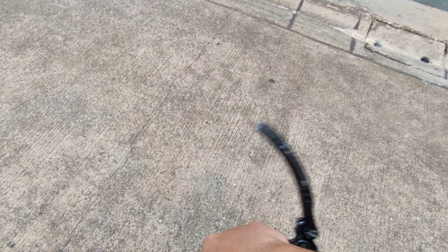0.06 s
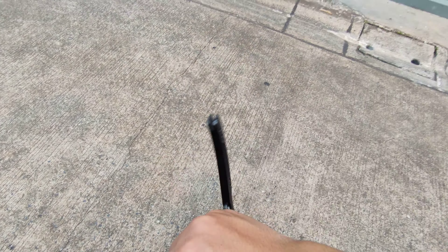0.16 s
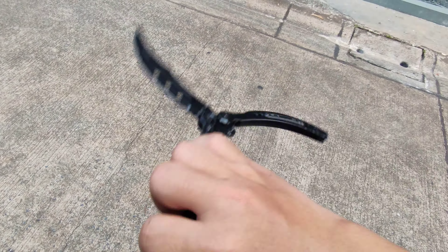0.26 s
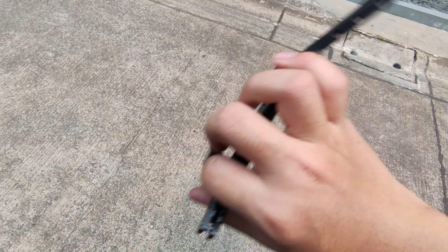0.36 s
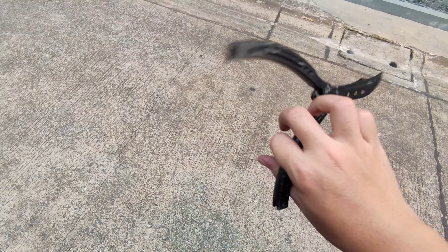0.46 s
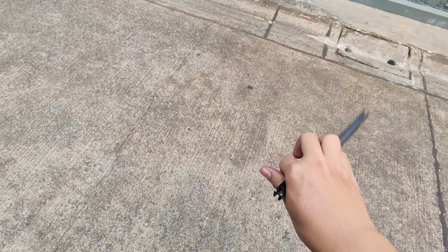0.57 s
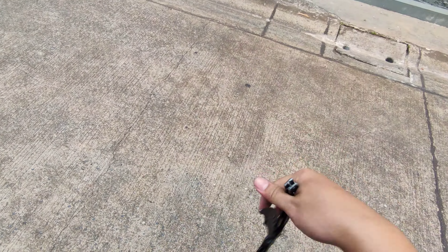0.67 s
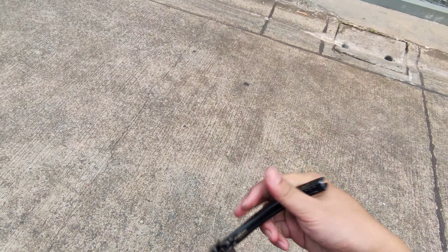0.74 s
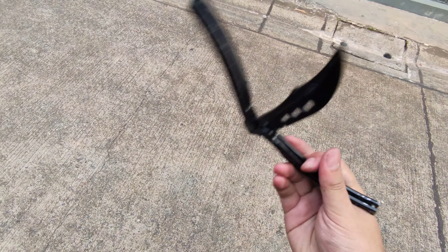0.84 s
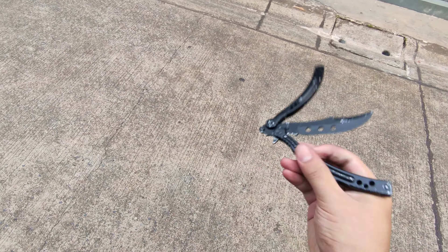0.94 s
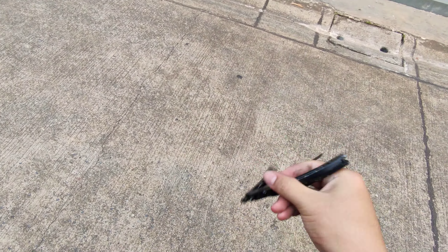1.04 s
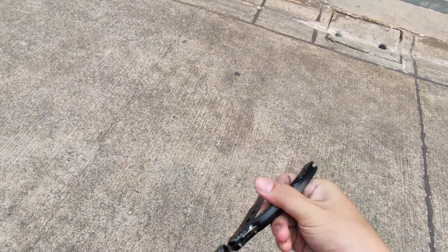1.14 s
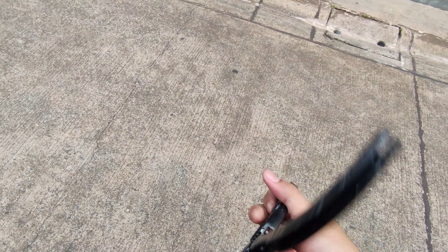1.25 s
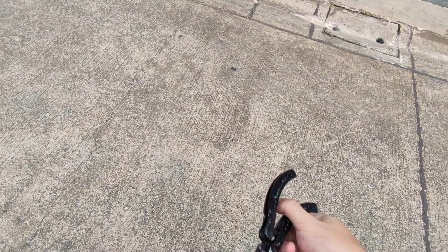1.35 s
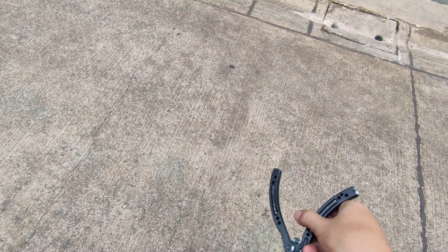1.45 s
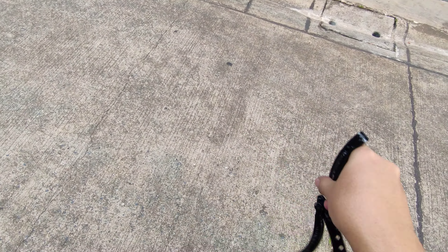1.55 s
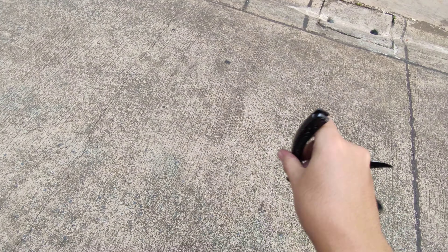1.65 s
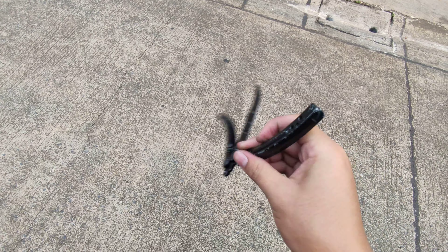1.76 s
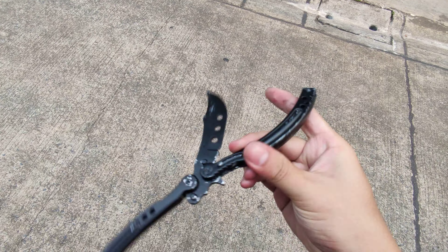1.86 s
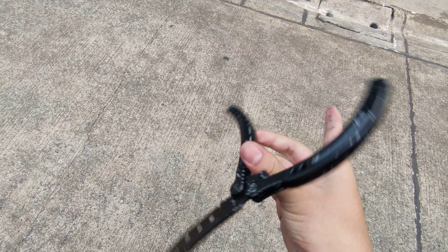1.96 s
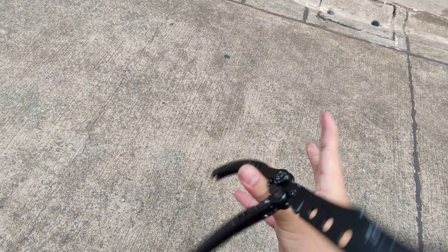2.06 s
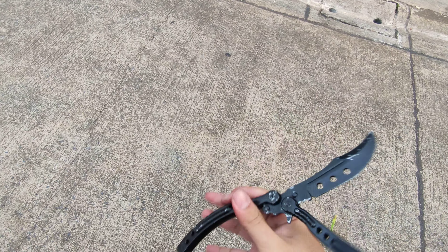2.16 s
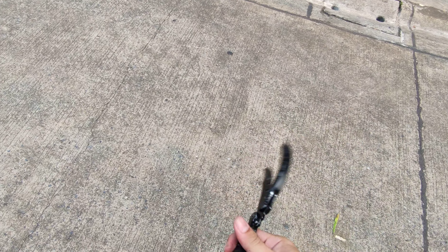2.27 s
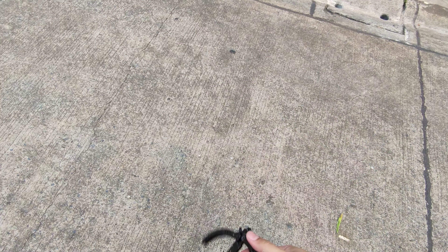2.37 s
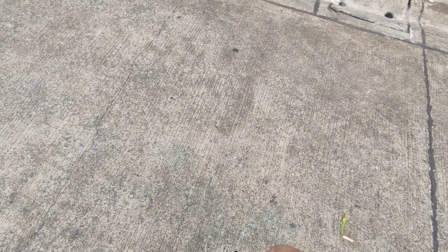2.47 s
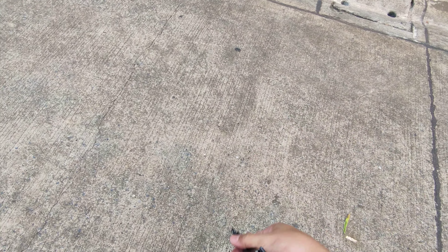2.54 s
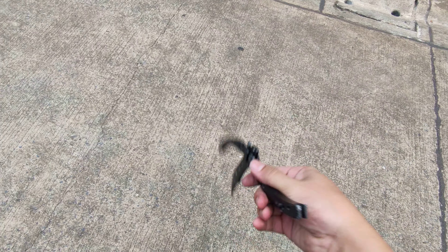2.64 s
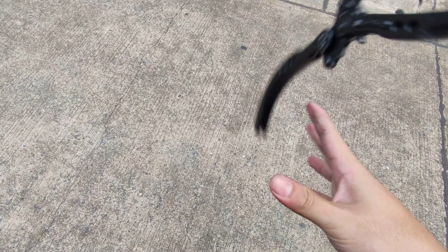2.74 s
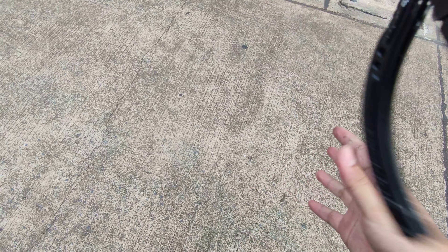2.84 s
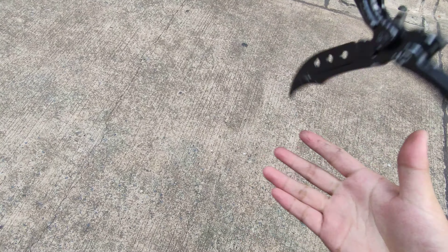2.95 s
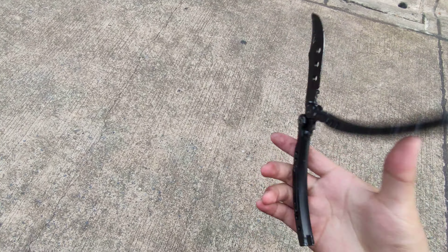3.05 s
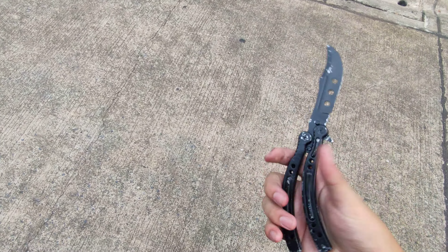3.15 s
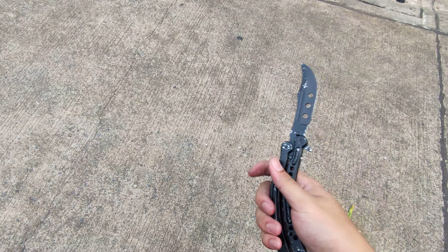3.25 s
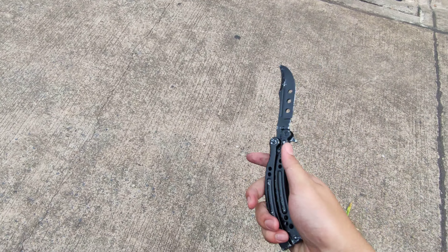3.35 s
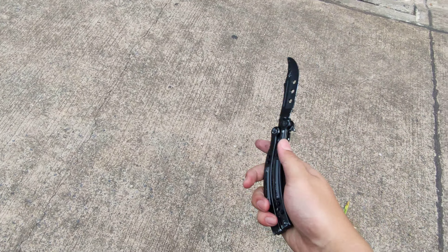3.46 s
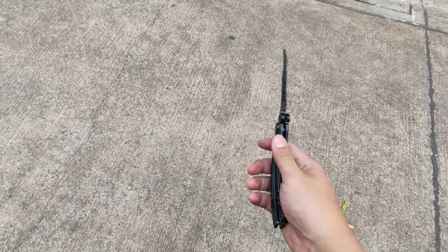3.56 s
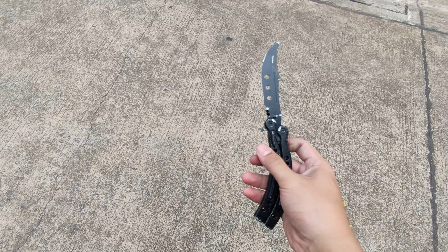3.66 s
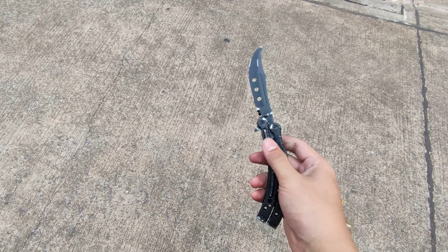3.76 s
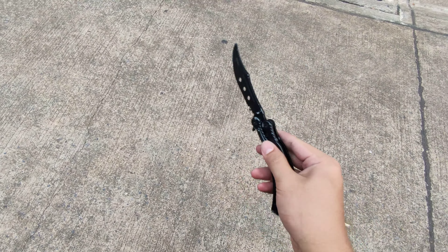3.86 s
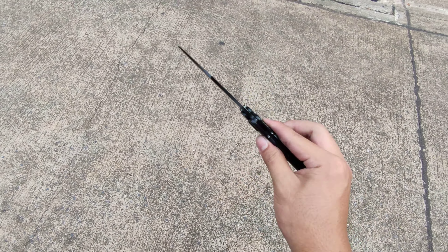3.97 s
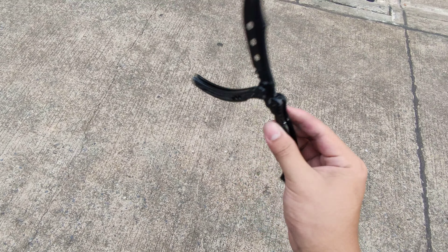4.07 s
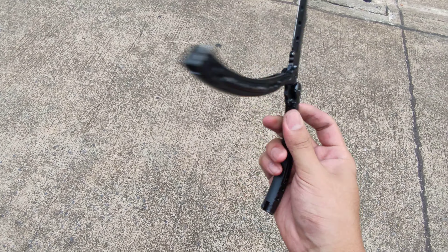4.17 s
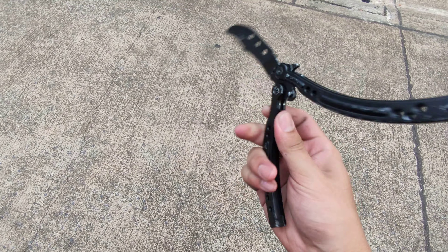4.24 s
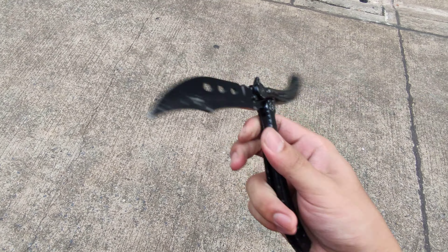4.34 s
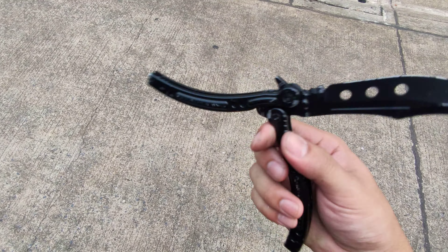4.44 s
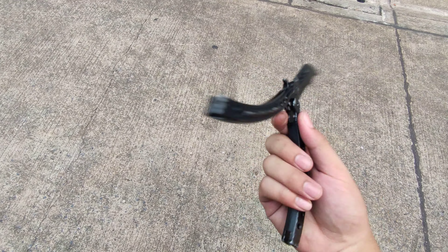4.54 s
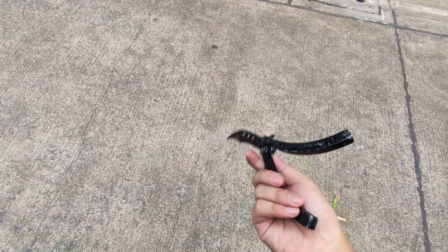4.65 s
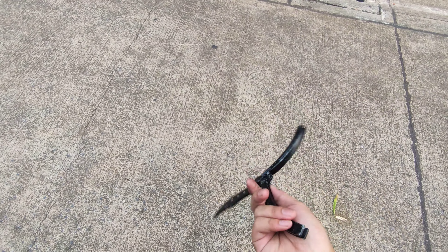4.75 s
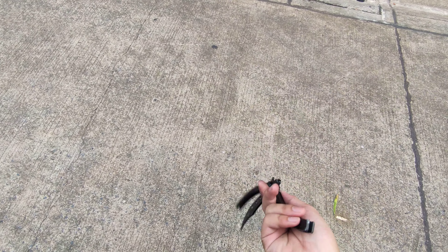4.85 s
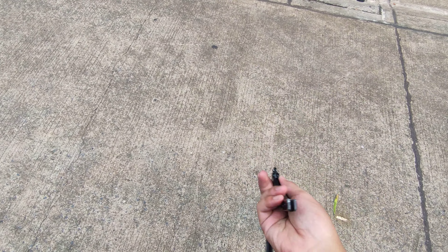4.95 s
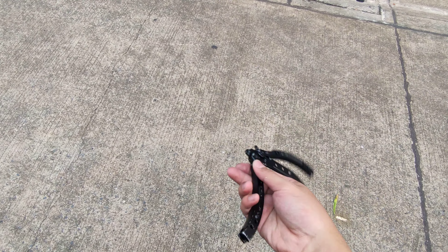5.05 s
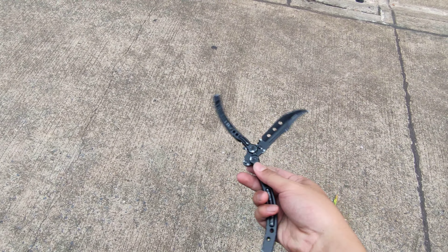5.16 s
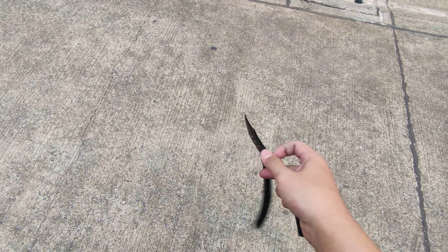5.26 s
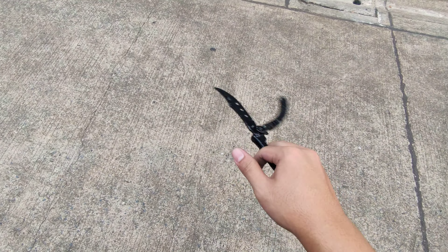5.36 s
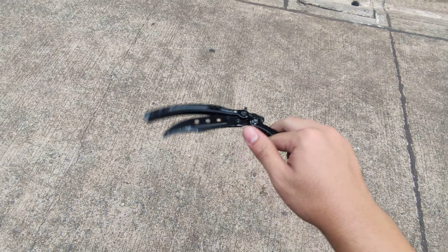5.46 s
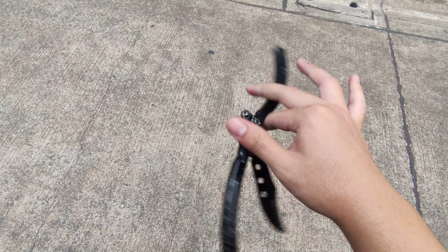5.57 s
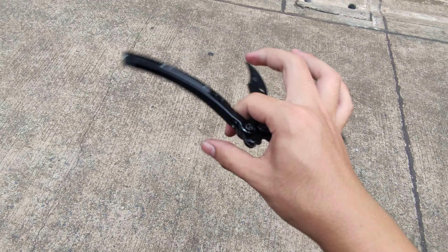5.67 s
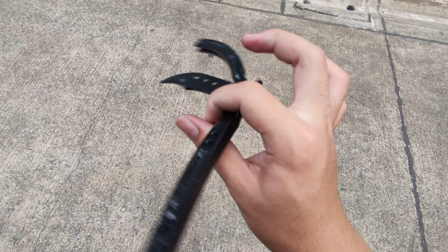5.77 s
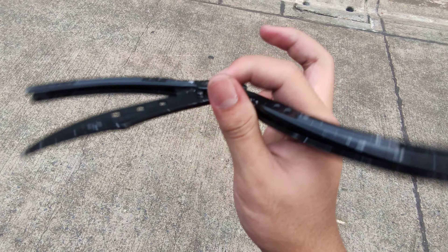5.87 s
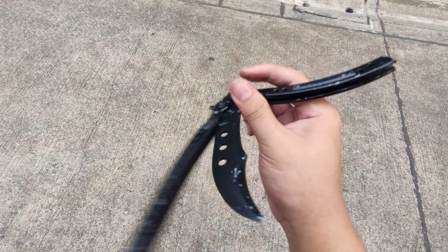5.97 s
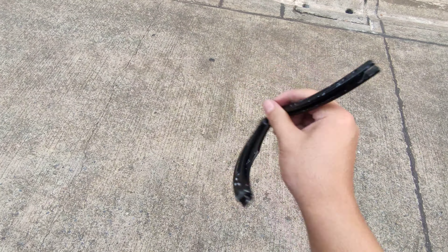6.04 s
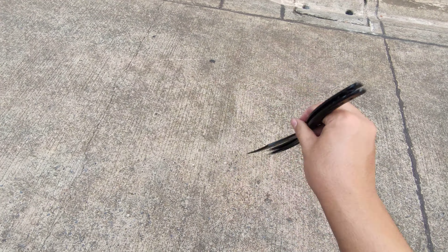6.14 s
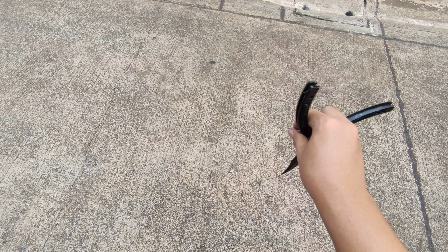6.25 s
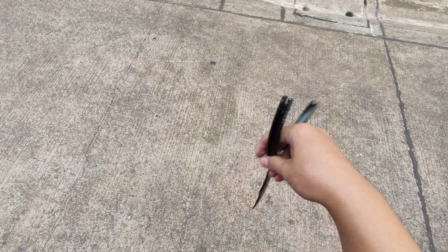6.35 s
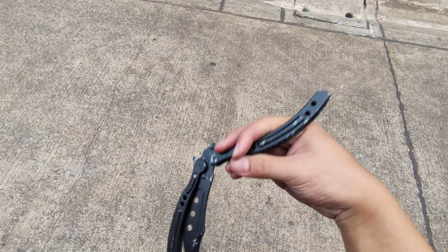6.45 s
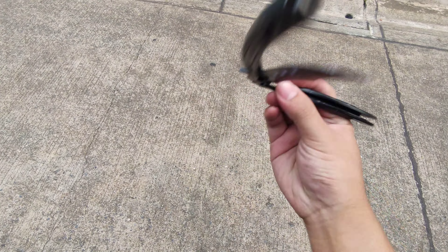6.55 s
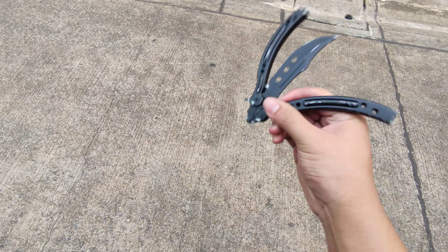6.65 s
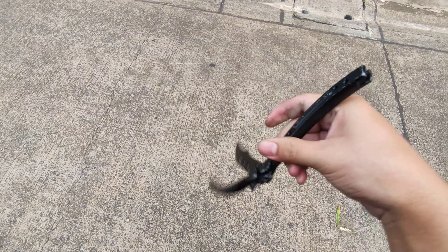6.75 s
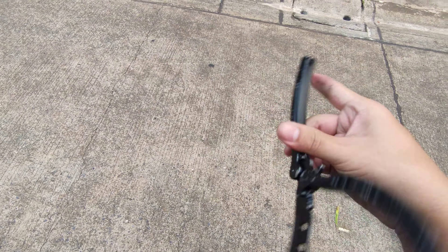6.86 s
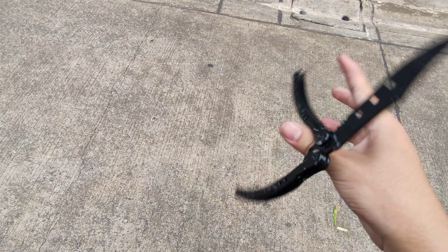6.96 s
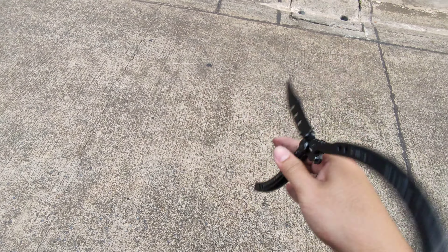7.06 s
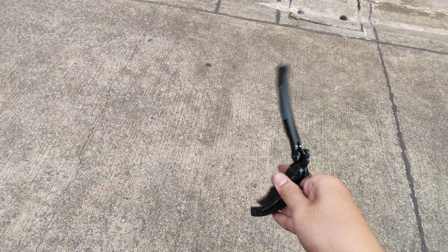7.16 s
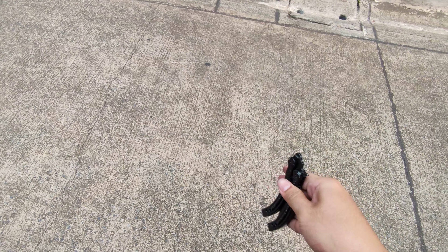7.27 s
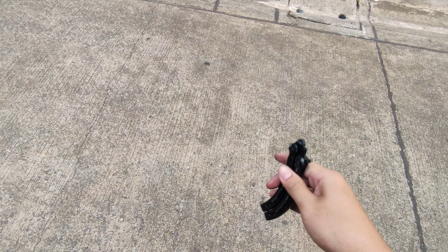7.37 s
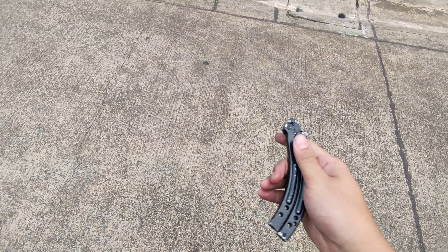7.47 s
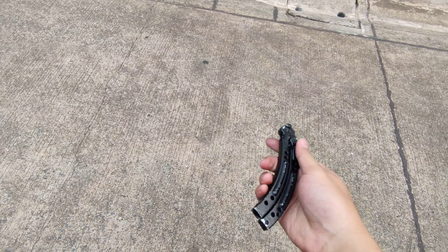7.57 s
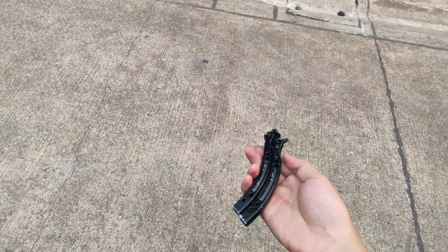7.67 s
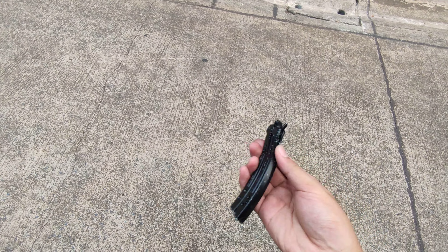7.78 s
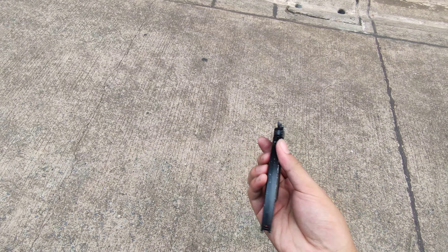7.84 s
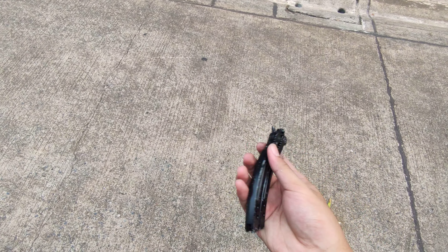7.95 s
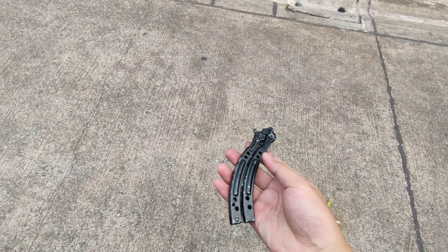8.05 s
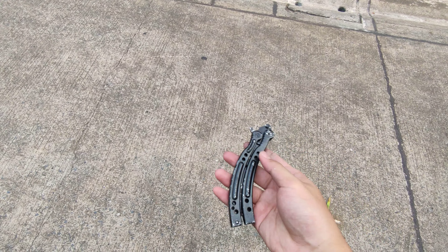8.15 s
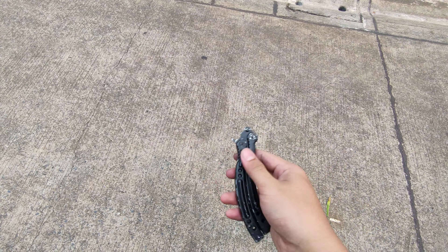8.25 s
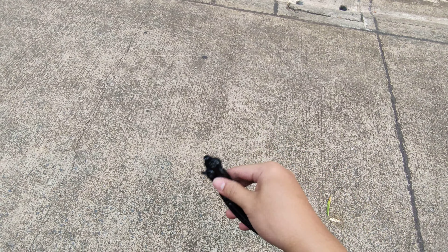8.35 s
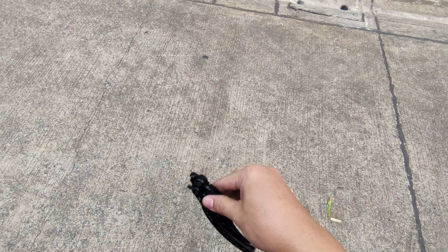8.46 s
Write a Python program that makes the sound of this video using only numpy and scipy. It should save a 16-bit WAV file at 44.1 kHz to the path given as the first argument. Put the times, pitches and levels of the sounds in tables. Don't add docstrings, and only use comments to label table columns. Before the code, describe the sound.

Outdoors near houses, birds whistle quickly while tiny pins and a latch tick. Metal handles then slap the palm and clatter in short dry bursts, separated by quieter ticking. A nasal bird squeal sounds midway, followed by another whistled song. Two loud snaps come late, then softer closing clacks. Low gusts buffet the close phone microphone above faint sleeve rustle and steady traffic; the treble is cut off.

```python
import sys
import numpy as np
from scipy import signal
from scipy.fft import rfft, irfft
from scipy.io import wavfile
from scipy.ndimage import uniform_filter1d, map_coordinates

SR = 44100
rng = np.random.default_rng(int(sys.argv[2]) if len(sys.argv) > 2 else 0)


def convert_level_to_amplitude(level_db):
    exponent = np.asarray(level_db, float) / 20
    return 10 ** exponent


def to_wav(s):
    ch = np.atleast_2d(s).T
    pcm = np.round(np.clip(ch, -1, 1) * 32767)
    wavfile.write(sys.argv[1], SR, pcm.astype(np.int16))


N = 375291
T = np.arange(N) / SR


def unit(x):
    return x / np.sqrt(np.mean(x ** 2))


def band(x, lo_hz, hi_hz, order=2):
    return signal.sosfilt(signal.butter(order, [lo_hz, hi_hz], "band", fs=SR, output="sos"), x)


def walk(rate):
    k = int(SR / rate)
    held = np.repeat(rng.standard_normal(N // k + 1), k)
    slewed = uniform_filter1d(uniform_filter1d(held, k), k)
    return unit(slewed[:N])


def coloured(table, lo_hz, hi_hz):
    hz = np.maximum(np.fft.rfftfreq(N, 1 / SR), 1)
    points = np.array(table)
    gain = convert_level_to_amplitude(np.interp(np.log(hz), np.log(points[:, 0]), points[:, 1]))
    gain = gain * (hz >= lo_hz) * (hz < hi_hz)
    return irfft(rfft(rng.standard_normal(N)) * gain, N)


def add(out, s, x):
    i = int(s * SR)
    out[i:i + len(x)] += x[:N - i]


def ring(modes, chance, detune=.018, scatter_db=2.5):
    t = T[:1024]
    out = np.zeros(len(t))
    for (hz, db, t60), (a, b) in zip(modes, chance):
        decay = np.exp(-np.log(1000) * t / t60)
        out += convert_level_to_amplitude(db + scatter_db * b) * np.sin(2 * np.pi * hz * (1 + detune * a) * t) * decay
    return out


def knife():
    # (time [s], peak [dB], handle ring re peak [dB], body clack re peak [dB])
    clacks = [
        (3.195, -15, -14.5, -17.5),
        (5.0869, -14, -10, -6),
        (5.3448, -12.5, -13, -7),
        (6.9905, -15.5, -25, -12.5),
        (7.3118, -25, -5, -6),
        (7.9922, -23, -7, -6.5),
        (8.061, -19.5, -10, -12),
    ]
    rebounds = [(0.383, -34.5, -21.5, 5.5), (0.495, -36, -19, -18), (0.5083, -18.5, -52, -45.5),
                (1.417, -30, -35, 0.5), (2.096, -28.5, -15, -15.5), (2.138, -27.5, -38, -9.5),
                (2.183, -27.5, -33, -16.5), (3.15, -30, -9.5, -7.5), (3.264, -25.5, -11, -13),
                (5.008, -24, -24, -2), (5.3593, -29.5, -11, -2.5), (5.397, -32, -21, -24.5),
                (6.0996, -19, -29, -23), (7.2757, -36.5, -17, -8.5), (7.711, -34, -7.5, 2),
                (7.748, -36.5, -6, 3.5), (7.923, -34, -8, -5.5), (8.001, -29, -7.5, -26),
                (8.075, -36.5, -17, 0), (8.307, -38, -5, -9)]
    snaps = [
        (7.2952, -18, -8.5, -13),
        (7.298, -4.5, -8.5, -11),
        (7.3036, -16, -11, -18),
        (7.317, -22, -8, -10.5),
        (7.3762, -2, -13.5, -6),
        (7.383, -16, -7.5, -16),
    ]
    blows = [(1.3962, -12.5, -24.5, -1), (1.3993, -20, -15.5, -3), (1.4032, -18, -12.5, 0),
             (1.4114, -28, -27, -13), (3.225, -11.5, -9.5, -16), (3.2275, -15.5, -10, -12),
             (3.2296, -6.5, -9.5, -10), (3.238, -10, -12.5, -13), (3.2372, -11.5, -17, -15.5),
             (3.2441, -11, -16.5, -12.5), (3.2462, -14.5, -22, -12), (3.2492, -16.5, -15, -8.5),
             (4.9899, -7, -18, -24), (4.9925, -8, -15, -14), (4.9944, -7, -12, -9), (4.997, -12, -16, -15),
             (5.0005, -18, -16, -14), (6.1143, -17, -8, -10), (6.1165, -19, -8, -14),
             (6.1195, -11, -8.5, -6), (6.122, -12, -7, -6), (6.1258, -16.5, -6.5, -13),
             (6.13, -15, -14, -16), (6.132, -17, -16.5, -20.5), (6.1348, -11.5, -10.5, -12),
             (6.137, -20, -18, -18), (6.5534, -37, -10.5, 0.5), (6.56, -31, -19, -7),
             (6.571, -28.5, -29, -12), (6.5745, -26, -33.5, -20.5), (6.58, -33, -24, -15),
             (7.3635, -30, -8, -6), (7.3695, -24, -14, -14), (7.372, -23, -12, -10),
             (7.3785, -12, -12, -5.5), (7.391, -21, -11, -7), (7.395, -22.5, -9, -4.5)]
    # (time [s], peak [dB], body clack re peak [dB])
    ticks = [(0.0136, -44.5, 9), (0.135, -42, 5.5), (0.182, -47, 4), (0.4614, -48.5, 5.5),
             (0.626, -42, -18), (0.657, -31, -22), (0.778, -34.5, -40), (5.871, -52.5, -5),
             (1.8, -34, -11.5), (2.1538, -36, -20), (2.178, -37, -25), (2.2887, -48.5, -7),
             (2.354, -34.5, -21), (2.4483, -37, -29), (2.731, -46, -23), (3.1655, -36.5, -14),
             (3.171, -44.5, 3.5), (3.183, -44.5, -19), (3.272, -31, -11), (3.7434, -43, -17),
             (4.0715, -44, -12), (4.144, -45.5, -16), (4.3786, -34, -5), (4.407, -36, -19),
             (4.428, -45, -2), (4.669, -41.5, -5.5), (4.716, -43, 3.5), (4.725, -47.5, 4),
             (6.6577, -35, -10.5), (6.7068, -37, -24), (8.481, -47.5, -1), (0.149, -53, -21),
             (0.189, -46, -3), (0.314, -53, -20), (1.139, -38.5, -16), (1.4845, -54, -28),
             (1.8507, -44, -19), (4.344, -49, -19), (4.8293, -63, -9), (7.0724, -55.5, -23.5),
             (7.0978, -48.5, -18.5), (7.1357, -49.5, -12), (7.227, -54, -22), (7.283, -35, -13),
             (8.179, -57, -1), (5.08, -25, -14)]
    # (frequency [Hz], level [dB], t60 [s])
    pin_modes = [(6980, 0, .016), (7350, -4, .009), (6600, -4, .012), (6250, -9, .011), (5900, -14, .007)]
    handle_modes = [(4900, 0, .016), (4400, -11, .006), (5400, -7, .006)]
    body_modes = [(2450, 0, .017), (2750, -2, .009), (3350, 0, .008), (3800, -10, .005), (2200, -8, .008)]
    # (low edge [Hz], high edge [Hz])
    part_bands = [(5600, 9000), (4100, 5700), (2150, 4000)]
    tick_handle_db, hardest_db = -17, -2

    contacts = [(*row, 4.04) for row in clacks]
    contacts += [(*row, 3.4) for row in rebounds]
    contacts += [(*row, 0.7) for row in snaps]
    contacts += [(*row, 2.6) for row in blows]
    contacts += [(s, db, tick_handle_db, body_db, 2.8) for s, db, body_db in ticks]
    out, t = np.zeros(N), T[:512]
    for s, db, handle_db, body_db, chatter_ms in contacts:
        u = t / (chatter_ms / 1000)
        d = rng.standard_normal(len(t))
        bounces = d * np.abs(d) ** .6 * np.tanh(4 * u) ** 2 * np.exp(-1.8 * u)
        parts = [(pin_modes, 0), (handle_modes, handle_db), (body_modes, body_db)]
        for (modes, rel_db), edges_hz in zip(parts, part_bands):
            struck = ring(modes, rng.standard_normal((8, 2)))
            part = band(signal.fftconvolve(bounces, struck), *edges_hz, order=3)
            add(out, s - .0006, part / np.abs(part).max() * convert_level_to_amplitude(min(db, hardest_db) + rel_db))
    return out


def slaps():
    # (time [s], peak [dB])
    palm_hits = [(1.395, -38), (1.738, -30.5), (3.192, -44), (3.228, -20.5), (3.237, -26), (3.244, -30),
                 (4.992, -32), (4.995, -19.5), (5.084, -38), (6.119, -8.5), (6.125, -12.5), (6.129, -22),
                 (6.135, -24), (7.298, -24), (7.3755, -12.5)]
    out, t = np.zeros(N), T[:4096]
    for s, db in palm_hits:
        burst = rng.standard_normal(len(t)) * np.tanh(t / 0.0012) * np.exp(-t / 0.0018)
        slap = band(burst, 230, 1500)
        add(out, s, convert_level_to_amplitude(db) * slap / np.abs(slap).max())
    return out


def sing(s, length, db, pitch, partials, waver):
    attack, release = 0.2, 0.12
    u = T[:int(length * SR)] / length
    turns = np.cumsum(pitch(u) * (1 + waver[int(s * SR):][:len(u)])) / SR
    swell = np.sin(np.pi / 2 * np.clip(np.minimum(u / attack, (1 - u) / release), 0, 1)) ** 2
    tone = sum(convert_level_to_amplitude(d) * np.sin(2 * np.pi * k * turns) for k, d in partials)
    return s, np.sqrt(2) * convert_level_to_amplitude(db) * swell * tone


def whistles():
    # (time [s], length [s], from [Hz], to [Hz], level [dB])
    first_slurs = [(0, 0.014, 3740, 3690, -49), (0.015, 0.14, 3740, 3720, -58),
                   (0.192, 0.038, 4850, 3780, -47), (0.138, 0.044, 4530, 4800, -61),
                   (0.286, 0.027, 2450, 2210, -55), (0.305, 0.012, 2190, 2650, -48.5),
                   (0.419, 0.036, 2880, 4720, -51.5), (0.506, 0.075, 2420, 2800, -47),
                   (0.663, 0.027, 4050, 3930, -56.5), (0.691, 0.016, 4600, 3850, -54),
                   (0.708, 0.018, 3480, 3560, -52), (0.722, 0.032, 3560, 2660, -51),
                   (0.828, 0.014, 3330, 3050, -58), (0.853, 0.016, 3520, 3300, -50),
                   (0.976, 0.016, 2680, 2720, -56), (1.108, 0.034, 3550, 2630, -55),
                   (1.174, 0.038, 1980, 1940, -56.5), (1.288, 0.02, 2650, 2760, -56),
                   (1.33, .06, 3176, 3130, -63)]
    second_slurs = [(5.025, 0.062, 2300, 2220, -53), (5.134, 0.051, 2110, 1950, -55),
                    (5.198, 0.036, 2010, 2536, -44.5), (5.228, 0.067, 2685, 2630, -60.5),
                    (5.778, 0.019, 2660, 2600, -50.5), (5.817, 0.013, 2760, 2600, -53),
                    (5.799, 0.01, 3470, 3370, -53.5), (6.048, 0.012, 6030, 5200, -40),
                    (6.06, 0.014, 5650, 4700, -55), (6.218, 0.15, 3460, 3100, -51),
                    (6.917, 0.077, 2780, 2830, -58), (6.195, 0.027, 3130, 3150, -59),
                    (6.215, 0.029, 3230, 3490, -47), (6.511, 0.15, 3730, 3837, -52.5),
                    (6.675, 0.024, 4100, 4900, -66), (7.121, 0.064, 2680, 2570, -50.5),
                    (7.158, .07, 2580, 3580, -50), (7.608, .026, 2063, 1740, -56),
                    (7.629, 0.027, 1737, 2360, -49.5), (7.658, 0.026, 3380, 3050, -52),
                    (7.693, 0.024, 3155, 3310, -45), (7.75, 0.051, 3450, 1994, -53),
                    (7.84, 0.041, 2110, 2130, -54), (8.016, 0.044, 2550, 3650, -57),
                    (8.434, 0.018, 3460, 3450, -65)]
    # (time [s], length [s], turn [Hz], end [Hz], level [dB])
    arches = [
        (0.662, 0.034, 5020, 4840, -56),
        (0.307, 0.036, 2740, 2565, -43.5),
        (0.992, 0.05, 3310, 3910, -45),
        (5.351, 0.2, 4284, 2400, -48.5),
        (5.636, 0.088, 2980, 2117, -46.5),
        (6.74, 0.096, 5040, 3590, -50.5),
        (7.489, 0.033, 2706, 3180, -45.5),
    ]
    # (time [s], length [s], from [Hz], settled [Hz], level [dB])
    swoops = [
        (0.482, 0.054, 4700, 3010, -48),
        (1.305, 0.04, 2690, 3180, -56),
        (6.716, 0.04, 4250, 4730, -60),
        (5.994, .063, 3900, 6450, -47),
        (6.457, 0.068, 3950, 3720, -63),
        (6.888, 0.04, 2240, 2820, -51),
        (7.014, 0.064, 2490, 4270, -52.5),
        (7.081, 0.041, 4670, 3140, -49),
    ]
    lead = np.sqrt(0.45)
    swoop_share = 0.25
    out = np.zeros(N)
    clean = ([(1, 0), (2, -40)], .005 * walk(300))
    for s, length, from_hz, to_hz, db in first_slurs + second_slurs:
        slur = lambda u: from_hz + (to_hz - from_hz) * np.sin(np.pi / 2 * u) ** 2
        add(out, *sing(s, length, db, slur, *clean))
    for s, length, turn_hz, end_hz, db in arches:
        arch = lambda u: turn_hz + (end_hz - turn_hz) * (u * (1 + lead) - lead) ** 2
        add(out, *sing(s, length, db, arch, *clean))
    for s, length, from_hz, to_hz, db in swoops:
        swoop = lambda u: to_hz + (from_hz - to_hz) * np.exp(-u / swoop_share)
        add(out, *sing(s, length, db, swoop, *clean))
    return out


def squeals():
    # (time [s], length [s], from [Hz], to [Hz], level [dB])
    nasal_notes = [
        (4.115, 0.41, 1128, 1022, -58),
        (4.798, 0.31, 1129, 1044, -57.5),
    ]
    # (multiple of the fundamental, level [dB])
    nasal_partials = [(2, 0.5), (3, -18), (4, -0.5), (5, -21), (6, 0.5), (7, -9)]
    sag_share, hoarse, swell_db = .6, 0.018, 5.5
    out, waver = np.zeros(N), walk(300)
    for s, length, from_hz, to_hz, db in nasal_notes:
        sag = lambda u: to_hz + (from_hz - to_hz) * np.exp(-u / sag_share)
        gone = np.clip((T - s) / length, 0, 1)
        roughness = (.006 + hoarse * gone ** 4) * waver
        squeal = sing(s, length, db, sag, nasal_partials, roughness)[1]
        soft_start = convert_level_to_amplitude(-swell_db * (1 - gone[int(s * SR):][:len(squeal)]) ** 4)
        add(out, s, squeal * soft_start)
    return out


def chirps():
    # (time [s], length [s], top [Hz], bottom [Hz], level [dB])
    falls = [(1.303, 0.11, 5000, 4220, -53), (1.532, 0.32, 2170, 2035, -55), (1.744, 0.34, 3320, 2610, -58),
             (2.428, 0.092, 4800, 4050, -58.5), (2.481, 0.044, 3400, 2870, -64),
             (3.64, 0.095, 5000, 3940, -58.5), (3.687, 0.045, 3400, 2960, -61),
             (6.046, 0.046, 6200, 4750, -74), (7.775, 0.07, 4900, 4000, -58),
             (4.721, 0.15, 2950, 2494, -58.5), (5.778, 0.12, 2880, 2340, -52.5),
             (8.386, 0.086, 4950, 3870, -64)]
    out, rasp = np.zeros(N), walk(970)
    for s, length, top_hz, low_hz, db in falls:
        t = T[:int(length * SR)]
        hz = top_hz + (low_hz - top_hz) * t / length + 330 * rasp[int(s * SR):][:len(t)]
        add(out, s, convert_level_to_amplitude(db) * np.hanning(len(t)) * np.sin(2 * np.pi * np.cumsum(hz) / SR))
    return out


def birds():
    fading = convert_level_to_amplitude(2.0 * walk(80))
    return (whistles() + squeals() + chirps()) * fading


def walls(x):
    t60_s, gap_s, sway_ms = 0.62, 0.0076, .13
    t = T[:SR]
    echo = rng.standard_normal(SR) * np.exp(-np.log(1000) * t / t60_s) * np.clip(t / gap_s, 0, 1)
    wet = signal.fftconvolve(x, echo / np.sqrt(np.sum(echo ** 2)))[:N]
    return map_coordinates(wet, [(T + sway_ms / 1000 * walk(45)) * SR], mode="mirror")


def knocks():
    # (time [s], peak [dB], frequency [Hz])
    pushes = [(0.18, -18.5, 72.4), (1.082, -17, 93), (1.739, -15.5, 109), (1.899, -17, 153),
              (2.031, -15.5, 106), (2.207, -20.5, 106), (2.887, -19.5, 158), (3.125, -14.5, 79.4),
              (3.141, -14, 147), (3.264, -23, 210), (3.671, -22, 139), (5.9, -14.5, 88), (6.114, -10.5, 62),
              (6.134, -7.5, 172), (6.753, -13, 174), (6.769, -14, 93), (6.908, -17, 159),
              (7.076, -26, 59.6), (7.097, -18, 68), (7.185, -14, 130), (7.338, -20.5, 78),
              (7.405, -14.5, 97), (7.424, -13.5, 237), (7.579, -16.5, 114), (7.602, -14, 150),
              (7.796, -17.5, 127)]
    pulls = [
        (4.992, -10.5, 152),
        (6.1257, -10.5, 141),
        (7.3755, -14.5, 111),
    ]
    out, t = np.zeros(N), T[:4096]
    for s, db, hz, sign in [(*row, 1) for row in pushes] + [(*row, -1) for row in pulls]:
        swing = np.sin(2 * np.pi * hz * t) * np.tanh(6 * hz * t) * np.exp(-(t * hz / 0.8) ** 2)
        add(out, s, sign * convert_level_to_amplitude(db) * swing)
    return out


def wind():
    # (time [s], rumble level [dB])
    gusts = [(0, -40), (.73, -41.5), (1.3, -34), (1.87, -28), (2.11, -36.5), (2.63, -37.5), (3.08, -34),
             (3.53, -33.5), (3.89, -28), (4.0, -34.5), (4.79, -35), (5.21, -36.5), (5.45, -36),
             (5.97, -29.5), (6.19, -42.5), (6.8, -32), (7.51, -31.5), (8.51, -37.5)]
    # (frequency [Hz], density [dB per Hz])
    turbulence = [(12, -52), (22, -47), (49, -1.5), (75, 1), (125, -2), (286, -9), (375, -18.5), (576, -36),
                  (755, -34.5), (900, -35.5), (1170, -55.5), (1980, -120)]
    flutter_db, flutter_follows, middling_db = -44, 0.98, -34
    buffet = walk(22)
    rumble_db = np.interp(T, *np.transpose(gusts))
    low = np.zeros(N)
    for lo_hz in 20 * 1.5 ** np.arange(6):
        flicker = convert_level_to_amplitude(2.6 * buffet + 2.2 * walk(lo_hz / 3))
        low += flicker * coloured(turbulence, lo_hz, 1.5 * lo_hz)
    high = convert_level_to_amplitude(3.6 * buffet + 2.4 * walk(40)) * coloured(turbulence, 228, 1100)
    high_db = flutter_db + flutter_follows * (rumble_db - middling_db)
    return convert_level_to_amplitude(rumble_db) * unit(low) + convert_level_to_amplitude(high_db) * unit(high)


def rustle():
    # (centre [s], length [s], level [dB], bright layer re level [dB])
    rubs = [(0.05, .25, -90, 20), (0.56, .3, -90, 18), (1.58, 0.41, -57.5, -0.5), (1.9, .16, -67.5, 9),
            (2.2, 0.69, -70.5, -2), (3.65, 0.064, -80, 4), (4.02, 0.16, -92, 6), (4.76, 0.14, -78, -11),
            (6.312, .6, -65.5, -8), (7.849, 0.16, -60, -13), (8.4, 0.58, -64, -13)]
    middle_db = -10
    rest_db, rest_bright_db = -70, -77
    grain = convert_level_to_amplitude(2.5 * walk(90))
    dull = unit(grain * band(rng.standard_normal(N), 1000, 2300))
    middle = unit(grain * band(rng.standard_normal(N), 2300, 5800))
    bright = unit(grain * band(rng.standard_normal(N), 5850, 7100, order=4))
    bright = bright + convert_level_to_amplitude(middle_db) * middle
    out = convert_level_to_amplitude(rest_db) * dull + convert_level_to_amplitude(rest_bright_db) * bright
    for s, length, db, bright_db in rubs:
        swell = np.exp(-(2 * (T - s) / length) ** 2)
        out = out + convert_level_to_amplitude(db) * swell * (dull + convert_level_to_amplitude(bright_db) * bright)
    return out


def traffic():
    # (frequency [Hz], density [dB per Hz])
    town = [(120, -30), (200, -6), (298, 1), (380, -6.5), (463, -3.5), (1090, -23), (1570, -28.5),
            (2200, -22), (3700, -41.5), (5590, -47.5), (7030, -36.5), (7700, -38), (10000, -89),
            (16900, -120)]
    return convert_level_to_amplitude(-48.5 + 1.0 * walk(0.94)) * unit(coloured(town, 200, 8000))


def scene():
    knife_wet_db, bird_wet_db = -18, -4
    steel, song = knife(), birds()
    wet = walls(convert_level_to_amplitude(knife_wet_db) * steel + convert_level_to_amplitude(bird_wet_db) * song)
    return (steel + slaps() + song + wet + knocks() + wind() + rustle() + traffic())[None]


def smear(x, ahead_s=0.019, smear_db=-30):
    t = T[:1024]
    tail = rng.standard_normal(len(t)) * np.exp(-t / ahead_s)
    tail = tail / np.sqrt(np.sum(tail ** 2))
    ahead = signal.fftconvolve(band(x[0], 3500, 7500)[::-1], tail)[:N][::-1]
    return x + convert_level_to_amplitude(smear_db) * ahead


def roll_off(x):
    return signal.sosfilt(signal.butter(12, 8610, fs=SR, output="sos"), x)


def record(dry):
    x = smear(.95 * np.tanh(dry / .95))
    low_pass = signal.ellip(9, .1, 42, 7570, fs=SR, output="sos")
    x = signal.sosfiltfilt(low_pass, x)
    return roll_off(x)


dry = scene()
out = record(dry)
to_wav(out)
```